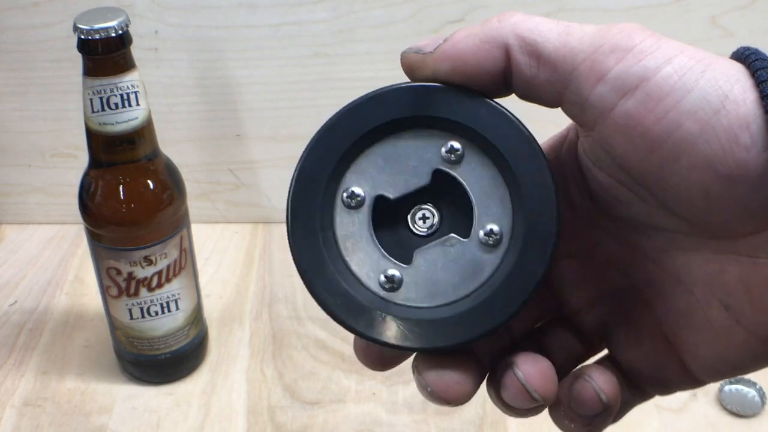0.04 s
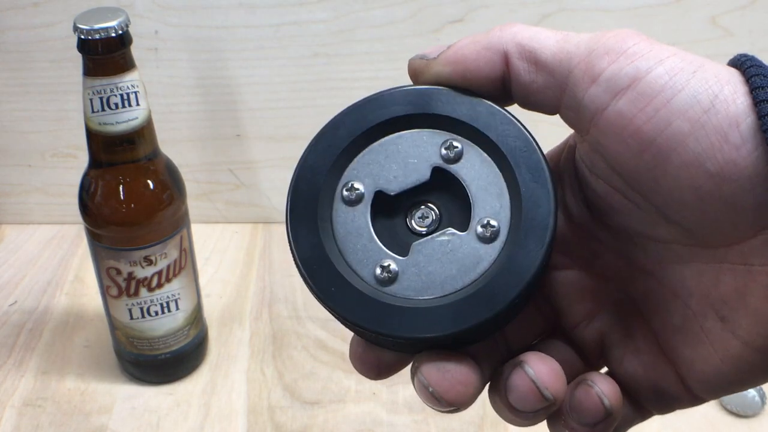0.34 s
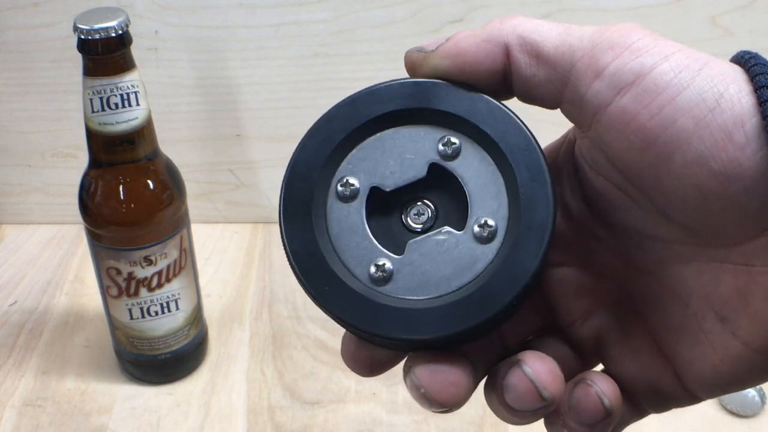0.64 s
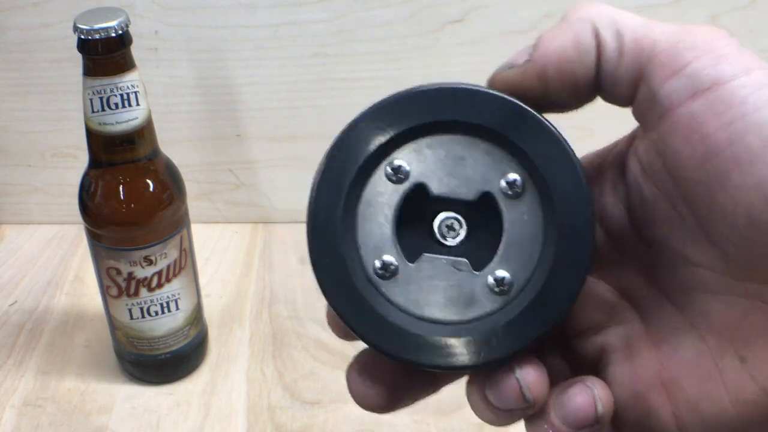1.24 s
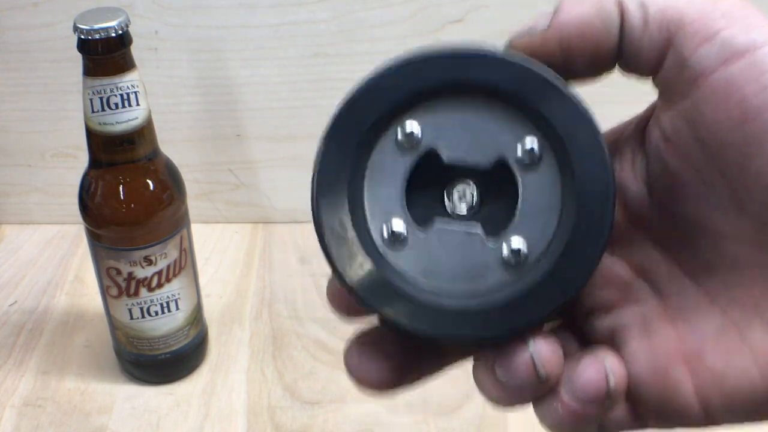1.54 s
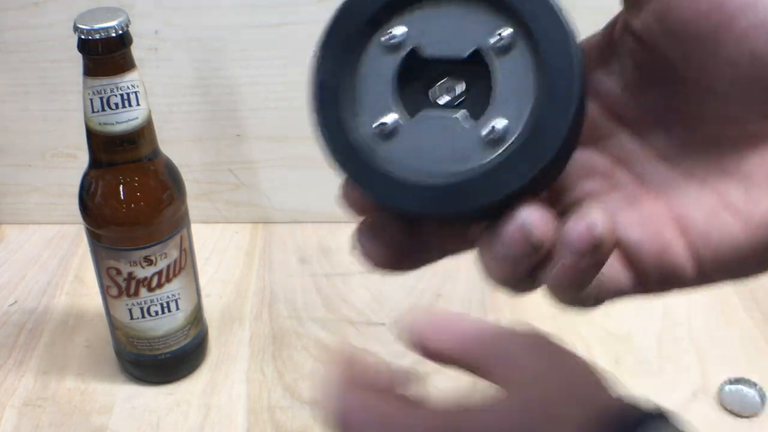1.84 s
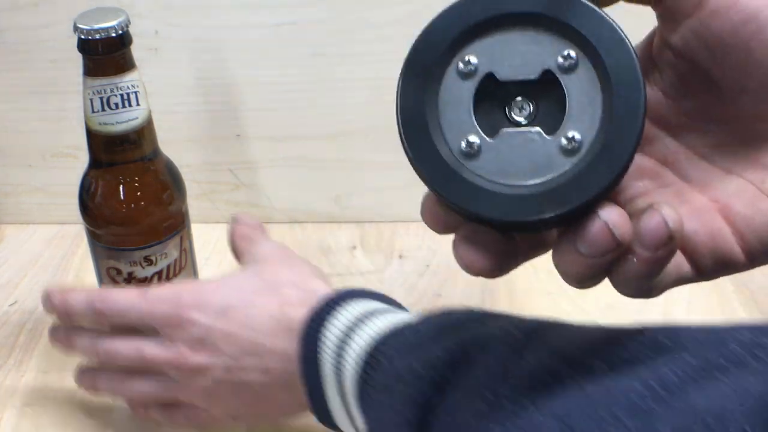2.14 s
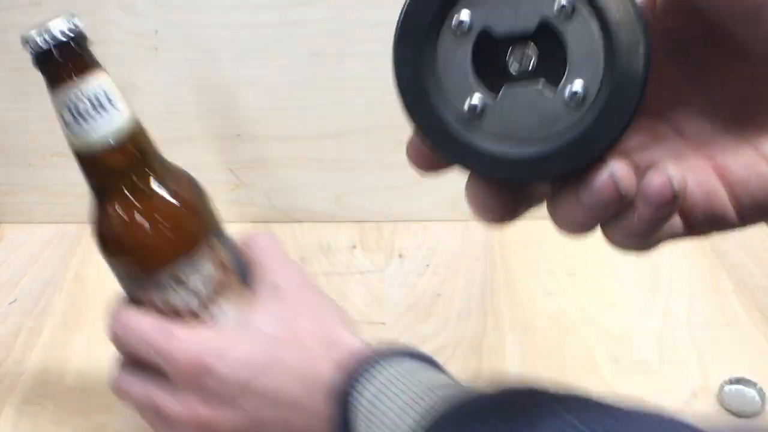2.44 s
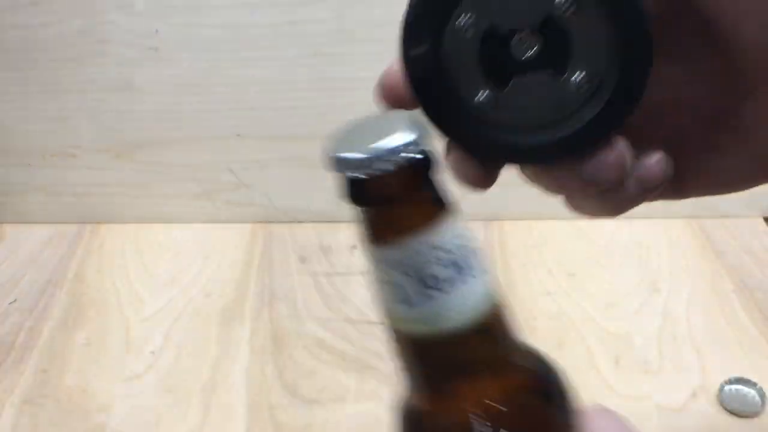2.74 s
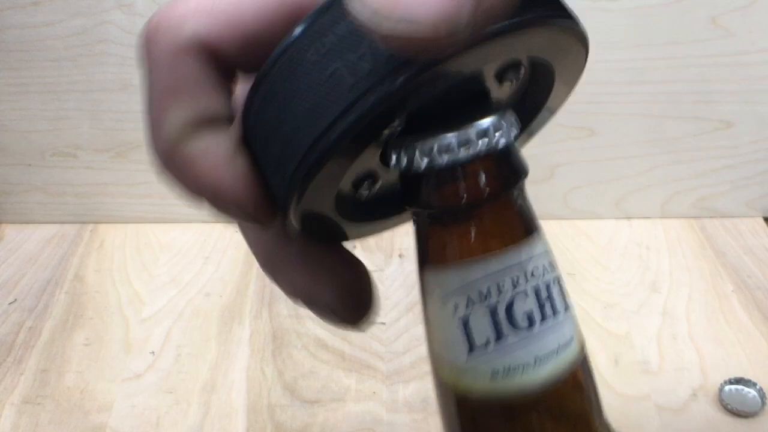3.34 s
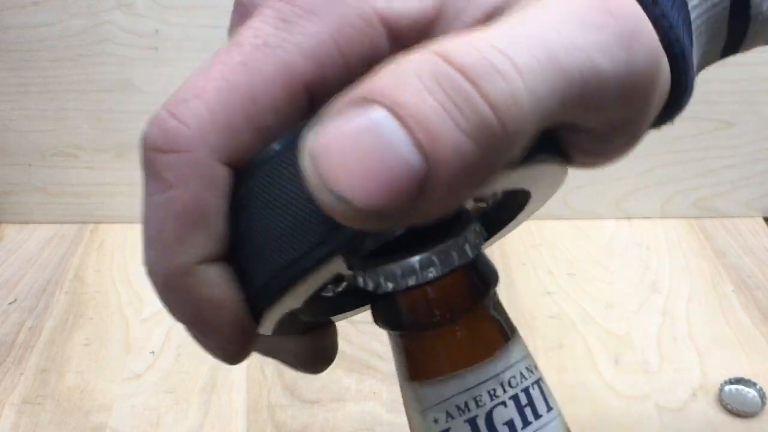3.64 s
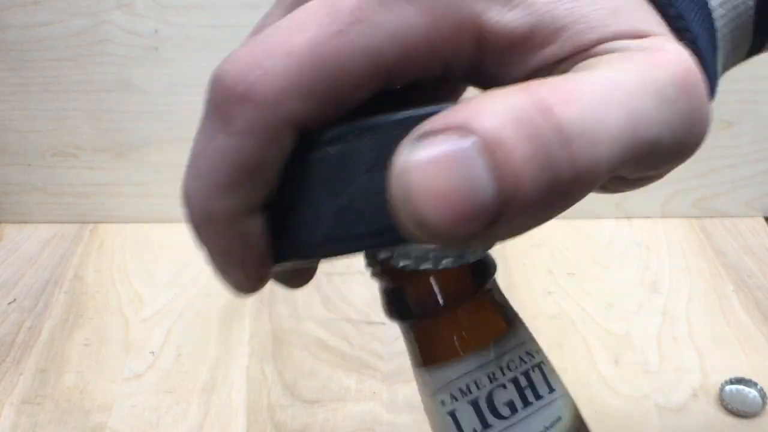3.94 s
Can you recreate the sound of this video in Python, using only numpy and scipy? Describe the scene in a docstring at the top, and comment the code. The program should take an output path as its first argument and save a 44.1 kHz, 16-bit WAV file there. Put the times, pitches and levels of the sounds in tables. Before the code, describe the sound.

A metal bottle opener clatters onto a capped glass bottle, then ticks against the cap.

```python
"""A puck-shaped steel bottle opener taps a capped glass bottle, clatters onto the cap, then rubs and
ticks as it is worked into place. Taps and bounces crack sharply and set the steel or glass ringing.
Before that a hand and sleeve bump the wooden table and slide the bottle off it.
One close microphone hears it all in a small room with a faint hum and a slowly fading rush of air."""
import sys
import numpy as np
from scipy import signal
from scipy.fft import rfft, irfft
from scipy.io import wavfile

SR = 44100
rng = np.random.default_rng(int(sys.argv[2]) if len(sys.argv) > 2 else 0)


def wrap_up_sound(samples):
    """Save the sound to the file named by the first command line argument, as 16-bit audio."""
    columns = np.atleast_2d(samples).T
    # keep every value between -1 and 1, then stretch to whole-number steps
    tamed = np.clip(columns, -1, 1)
    steps = np.round(tamed * 32767).astype(np.int16)
    wavfile.write(sys.argv[1], SR, steps)


N = 176400
T = np.arange(N) / SR
RING_T = T[:SR // 2]  # half a second for a hit to ring out

# the notes of the opener's steel plate (pitch [Hz], level [dB], time to fade by 60 dB [s])
PLATE_NOTES = [(3258, 1.5, .02), (3222, -14, .12), (3147, -24, .14), (2190, -19, .02), (2995, -27, .06),
               (1082, -22, .035)]
# the high ping of its edge (pitch [Hz], level [dB], fade time [s])
EDGE_NOTES = [(7230, -5.5, 0.0066), (7850, -14.5, .007), (8070, -11, .009)]


def amp(db):
    """Turn decibels into a number to multiply by."""
    return 10 ** (np.asarray(db) / 20)


def unit(x):
    """Scale a sound to an average strength (rms) of 1."""
    return x / np.sqrt(np.mean(x ** 2))


def fade(fade_s):
    """A level that falls by 60 dB in fade_s seconds."""
    return np.exp(-np.log(1000) * RING_T / fade_s)


def curve(points):
    """A level that follows (time [s], level [dB]) points."""
    return amp(np.interp(T, *np.array(points).T))


def add(out, start, sound):
    """Mix a sound in at start seconds."""
    i = int(start * SR)
    out[i:i + len(sound)] += sound[:N - i]


def colour(x, tone, size=4096):
    """Shape a sound's lows and highs through (frequency [Hz], level [dB]) points."""
    hz, db = np.array(tone).T
    grid = np.maximum(np.fft.rfftfreq(size, 1 / SR), 1)
    gain = amp(np.interp(np.log(grid), np.log(hz), db))
    # arrange the filter so that nothing sounds before the hit
    cepstrum = irfft(np.log(gain))
    cepstrum[1:size // 2] *= 2
    cepstrum[size // 2 + 1:] = 0
    response = irfft(np.exp(rfft(cepstrum)))
    return signal.fftconvolve(x, response)[:len(x)]


def noise(tone):
    """Steady noise with the given tone."""
    return unit(colour(rng.standard_normal(N), tone))


def resonance(hz, width_hz):
    """A wavering note: noise kept to a band around one pitch."""
    f = np.fft.rfftfreq(N, 1 / SR)
    spectrum = rfft(rng.standard_normal(N)) / (1 + (2 * (f - hz) / width_hz) ** 2)
    return unit(irfft(spectrum, N))


def burst(shape):
    """A puff of noise whose level follows shape, with a total energy of 1."""
    x = rng.standard_normal(len(shape)) * shape
    return x / np.linalg.norm(x)


def ring(notes):
    """A struck object's fading notes, which start in alternating directions."""
    return sum((-1) ** k * amp(db) * fade(fade_s) * np.sin(2 * np.pi * hz * RING_T)
               for k, (hz, db, fade_s) in enumerate(notes))


def crack(tone, fade_s, noise_share):
    """One hard hit: a click, then so many short vibrations that they sound like noise."""
    x = np.sqrt(noise_share) * burst(fade(fade_s))
    x[0] += np.sqrt(1 - noise_share)
    return colour(x, tone)


def push(peak_s, length_s):
    """The level of a soft touch: a quick rise and a slower fall."""
    u = (T - peak_s) / length_s
    return np.exp(-np.where(u < 0, (3 * u) ** 2, u))


def stick_slip(roughness=.25, width_hz=500):
    """A level that flutters as glass catches and slips on wood."""
    return np.exp(roughness * resonance(0, width_hz))


def background():
    """A rush of air, its hum and a thin whine fade slowly over steady microphone hiss."""
    # the air dying down (time [s], level [dB])
    air_levels = [(0, -56), (1.3, -58.5), (2.1, -60), (2.9, -63.5), (4, -65.5)]
    # tones of the air and the hiss (frequency [Hz], level [dB])
    air_tone = [(20, -18), (45, 15), (75, 5), (170, -2.5), (260, -3.5), (450, -0.5), (1200, 2), (1950, 0.5),
                (2250, -4.5), (3500, -6), (4500, -5), (5500, -1), (6100, -6.5), (7000, -18.5),
                (10000, -33.5), (16000, -25)]
    hiss_tone = [(20, -14), (45, 16.5), (100, 15), (300, 13), (800, 6), (2500, -14), (5500, -1),
                 (7500, -8.5), (10500, -13), (12000, -13), (12750, -1.5), (13350, 0.5), (14100, -10),
                 (14800, -27), (15700, -9), (16200, -35)]
    # notes of the hum and the whine (pitch [Hz], width [Hz], starting level [dB])
    hum_notes = [(45.4, 15, -73), (248.8, 4.4, -71.5), (332, 13, -70.5), (579.2, 42, -70), (1198, 42, -71),
                 (1395, 20, -75.5), (1908, 77, -73.5)]
    whine_notes = [(2870, 30, -80), (3790, 60, -70)]
    whine_fade_db_per_s, hiss_db = 3.5, -65.5
    air = curve(air_levels)
    hum = sum(amp(db) * resonance(hz, width) for hz, width, db in hum_notes)
    hum *= (air / air[0]) ** 0.4  # the hum fades less than the air
    whine = sum(amp(db) * resonance(hz, width) for hz, width, db in whine_notes)
    whine *= amp(-whine_fade_db_per_s * T)
    return air * noise(air_tone) + hum + whine + amp(hiss_db) * noise(hiss_tone)


def sleeve_rustle():
    """Cloth and fingers rub, making a soft noise that swells and fades."""
    # the swell (time [s], level [dB])
    levels = [(0, -77), (1.5, -75), (1.95, -72.5), (2.3, -64), (2.55, -67.5), (2.8, -73), (3.15, -76),
              (4, -91.5)]
    # tone of the rustle (frequency [Hz], level [dB])
    tone = [(200, 11), (1200, 6.5), (2500, -15), (5500, 3), (7500, -1), (10500, -17), (12000, -7.5),
            (13400, 4), (15000, -15), (16200, -25)]
    return curve(levels) * noise(tone)


def table_bumps():
    """The arm bumps the table: a thump, a hollow ring and the boom of the table top's lowest note."""
    # soft bumps (time [s], length [s], thump level [dB], hollow ring level [dB])
    bumps = [(1.786, 0.012, -40, -74), (1.815, .01, -57, -78), (1.998, 0.028, -55.5, -54.5),
             (2.08, 0.027, -54.5, -53), (2.116, 0.016, -64, -65), (2.448, 0.02, -50, -60),
             (2.832, 0.027, -57, -63), (2.874, 0.023, -62, -72), (3.513, 0.033, -64, -58.5),
             (3.567, 0.05, -71, -57.5)]
    # tone of a thump (frequency [Hz], level [dB])
    thump_tone = [(20, -30), (45, -8), (85, 0), (130, -1), (190, -7), (360, -1), (520, -15), (1800, -20),
                  (3500, -36), (7000, -52), (16000, -75)]
    boom_db, boom_lag_s, boom_length_s = -58, 0.0067, 0.07
    thump = noise(thump_tone)
    hollow, boom = resonance(hz=432, width_hz=55), resonance(hz=79, width_hz=35)
    out = np.zeros(N)
    for when, length, thump_db, hollow_db in bumps:
        out += push(when, length) * (amp(thump_db) * thump + amp(hollow_db) * hollow)
        out += amp(boom_db) * push(when + boom_lag_s, boom_length_s) * boom
    return out


def bottle_slides():
    """The bottle's base scrapes over the wood in two short slides."""
    # slides (loudest moment [s], half length [s], level [dB])
    slides = [(2.363, 0.015, -44), (2.444, 0.011, -43.5)]
    # tone of glass on wood (frequency [Hz], level [dB])
    tone = [(100, -0.5), (550, -5), (1200, 3.5), (2100, -10), (2700, -8), (3300, -11.5), (4200, -7),
            (4450, -0.5), (4800, -4.5), (5400, 0.5), (6100, -5.5), (6800, -15.5), (10500, -35),
            (13500, -26), (16000, -36)]
    scrape = unit(stick_slip() * noise(tone))
    return sum(amp(db) * scrape / np.sqrt(1 + ((T - when) / length) ** 4) for when, length, db in slides)


def bottle_judder():
    """The tilting bottle chatters on the wood, slowing as it comes free."""
    peak_s, length_s, level_db = 2.452, .016, -47
    start_hz, drop_hz_per_s = 390, 5500
    hz = np.clip(start_hz - drop_hz_per_s * (T - peak_s), start_hz / 2, start_hz)
    chatter = np.sin(2 * np.pi * np.cumsum(hz) / SR)
    return amp(level_db) * stick_slip() * push(peak_s, length_s) * chatter


def opener_taps():
    """The steel plate glances off the cap: each tap cracks, rings and pings."""
    # taps (time [s], crack level [dB], plate level [dB], edge level [dB])
    taps = [(3.1366, -2, -16, -52), (3.1438, -12, -31, -21), (3.1498, -17, -44, -34),
            (3.1623, -12.5, -30, -22)]
    # tone of a tap (frequency [Hz], level [dB])
    tone = [(100, -17), (500, -15), (1100, 4), (2700, -9.5), (3600, 12), (5200, 9.5), (6000, -7),
            (6900, -5), (9300, -25), (12400, -9), (13800, -4), (16000, -27)]
    out, plate, edge = np.zeros(N), ring(PLATE_NOTES), ring(EDGE_NOTES)
    for start, crack_db, plate_db, edge_db in taps:
        hit = amp(crack_db) * crack(tone, fade_s=.009, noise_share=.25)
        add(out, start, hit + amp(plate_db) * plate + amp(edge_db) * edge)
    return out


def opener_clatter():
    """The cap drops into the jaws and bounces: steel and glass ring, and the rubber body thuds."""
    # bounces (time [s], crack level [dB], plate level [dB], bottle level [dB], snap level [dB])
    bounces = [(3.1947, -1, -13, -14.5, 2), (3.2028, -1.5, -23, -43, -4), (3.2086, -5, -20.5, -29, -4),
               (3.2127, -16, -32, -28.5, -9), (3.2155, -9, -31, -32, -18), (3.2159, -18, -29, -39, -18),
               (3.2193, -12.5, -22, -26, -23), (3.221, -18, -30, -46, -27)]
    # tones of the crack and the high snap (frequency [Hz], level [dB])
    crack_tone = [(70, -5.5), (270, 4.5), (480, 1.5), (700, 8.5), (1300, 6.5), (1900, -2), (3000, 4),
                  (4000, 14.5), (6000, -0.5), (7200, 0), (9700, -12), (11300, -9.5), (13600, -10),
                  (16000, -26)]
    snap_tone = [(7000, -26), (10200, -20), (11200, 0), (12400, -17), (13500, 4.5), (15200, -4),
                 (16300, -20)]
    # notes of the bottle and the opener's rubber body (pitch [Hz], level [dB], fade time [s])
    bottle_notes = [(625, -27, 0.27), (1037, -18.5, 0.094), (3670, -17, .045), (3880, -12, .045),
                    (3910, -24, .045), (4130, -9, .03), (4500, -20, .04), (5390, 1, 0.018),
                    (5500, -19, .07), (6420, -1.5, 0.015), (6645, -20, 0.12), (6742, -15.5, 0.1),
                    (12600, -22, .06), (13530, -12.5, .025)]
    rubber_notes = [(237, 3, 0.046), (348, 2.5, 0.054), (686, -2, 0.08), (1420, -3, 0.032)]
    out, plate, bottle = np.zeros(N), ring(PLATE_NOTES), ring(bottle_notes)
    for start, crack_db, plate_db, bottle_db, snap_db in bounces:
        snap = amp(snap_db) * crack(snap_tone, fade_s=.0096, noise_share=.25)
        hit = amp(crack_db) * crack(crack_tone, fade_s=.014, noise_share=.5)
        add(out, start, snap + hit + amp(plate_db) * plate + amp(bottle_db) * bottle)
    add(out, start=3.1955, sound=amp(-34) * ring(rubber_notes))
    return out


def jaw_rub():
    """The opener's jaws rub round the cap with a quiet scratching noise."""
    # rise and fall of the rubbing (time [s], level [dB])
    levels = [(3.22, -85), (3.28, -63), (3.43, -60.5), (3.54, -61), (3.585, -59.5), (3.62, -71),
              (3.70, -70), (3.76, -92)]
    # tone of the rubbing (frequency [Hz], level [dB])
    tone = [(200, 17), (900, 6.5), (2300, 1), (3600, -7), (5600, 3), (7000, -5.5), (9500, -7), (11000, -10),
            (13500, -6), (16000, -18)]
    return curve(levels) * noise(tone)


def jaw_ticks():
    """The jaws slip on the cap's crimped rim; the hand's pressure keeps each tick short."""
    # slips (time [s], click level [dB], knock level [dB], edge level [dB])
    slips = [(3.348, -11, -22.5, -70), (3.4248, -13.5, -15, -49), (3.4300, -24, -16.5, -60),
             (3.497, -24, -17.5, -70), (3.518, -28, -14.5, -70), (3.5856, -16, -36, -56),
             (3.5899, -27, -29, -38.5), (3.6363, -10.5, -20, -68), (3.6960, -41, -25.5, -75)]
    # tones of the click and the low knock (frequency [Hz], level [dB])
    click_tone = [(300, -16), (1500, -6), (2800, -17), (3550, 4), (4200, -4), (5400, -10), (6500, -25),
                  (15000, -45)]
    knock_tone = [(200, -28), (500, -6), (700, 4), (1150, 6.5), (1700, -14.5), (4000, -16), (9000, -58)]
    out, edge = np.zeros(N), ring(EDGE_NOTES)
    for start, click_db, knock_db, edge_db in slips:
        click = amp(click_db) * crack(click_tone, fade_s=.004, noise_share=.15)
        knock = amp(knock_db) * crack(knock_tone, fade_s=.02, noise_share=.5)
        add(out, start, click + knock + amp(edge_db) * edge)
    return out


def plate_spread(x):
    """Ripples in the struck plate reach the air at different moments, rounding off each click."""
    # bands that leave the plate late (frequency [Hz], narrowness [Q])
    late_bands = [(2500, 1.2), (4200, 1.3), (5500, 6), (7000, 5), (13500, 4)]
    for hz, q in late_bands:
        x = x - 2 * signal.lfilter(*signal.iirpeak(hz, q, fs=SR), x)  # delays the band, keeps its level
    return x


def room(x):
    """Sound bounces off the table and back board, then the walls, leaving a short tail that dulls."""
    # wall echoes, smeared by clutter (delay [s], level [dB])
    echoes = [(.019, -26), (.035, -27), (.043, -28)]
    tail_db, tail_rise_s, echo_rise_s, split_hz, near_db = -23, 0.028, .003, 4900, -18
    rise = 1 - np.exp(-(RING_T / tail_rise_s) ** 2)
    low_tail = amp(tail_db) * burst(rise * fade(fade_s=.35))
    high_tail = amp(tail_db) * burst(rise * fade(fade_s=.17))
    echo_shape = fade(fade_s=.025) * np.minimum(RING_T / echo_rise_s, 1)
    for delay, db in echoes:
        add(low_tail, delay, amp(db) * burst(echo_shape)[:SR // 10])
    keep_lows = signal.butter(2, split_hz, fs=SR, output="sos")
    keep_highs = signal.butter(2, split_hz, "high", fs=SR, output="sos")
    tail = signal.sosfilt(keep_lows, low_tail) + signal.sosfilt(keep_highs, high_tail)
    near_echoes = amp(near_db) * burst(fade(fade_s=.07))
    return x + signal.fftconvolve(x, tail + near_echoes)[:N]


def scene():
    """Mix everything into one channel; only the opener's hits echo in the room."""
    rubbing = jaw_rub()
    hits = room(plate_spread(opener_taps() + opener_clatter() + jaw_ticks()))
    handling = sleeve_rustle() + table_bumps() + bottle_slides() + bottle_judder()
    return (hits + rubbing + handling + background())[None]


def record(dry):
    """The recorder cuts off the highest treble."""
    top_hz = 16200
    return signal.sosfilt(signal.ellip(8, .2, 70, top_hz, fs=SR, output="sos"), dry)


dry = scene()
out = record(dry)
wrap_up_sound(out)
```